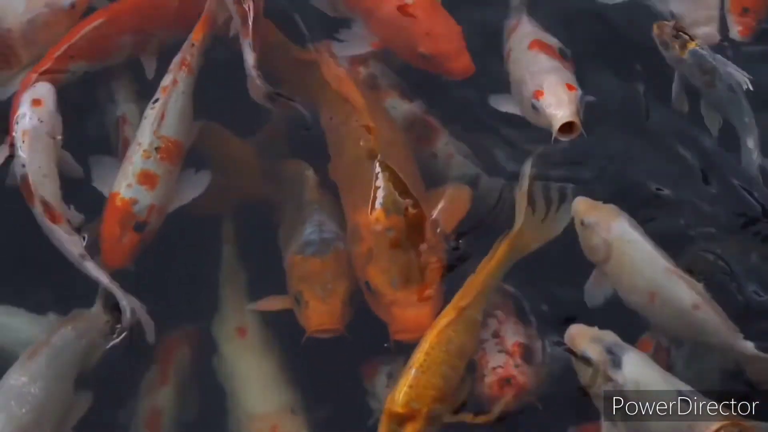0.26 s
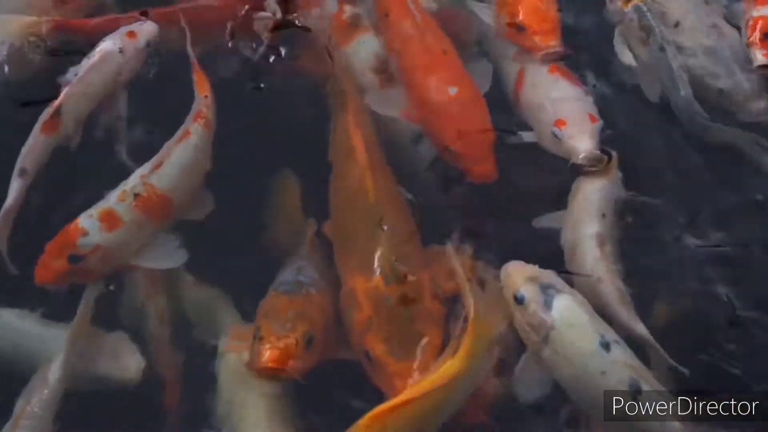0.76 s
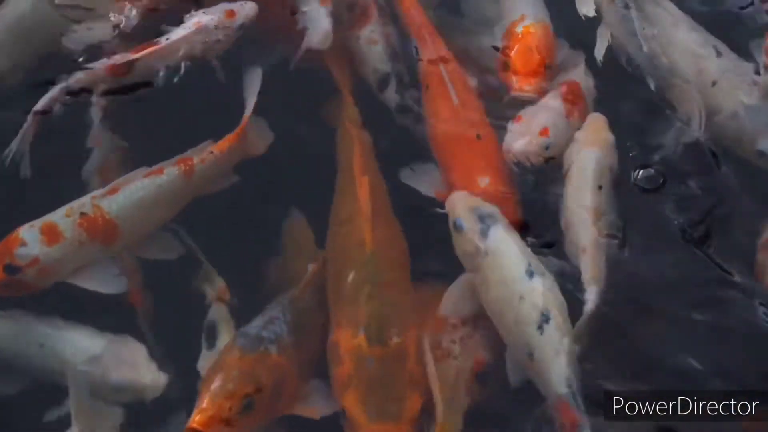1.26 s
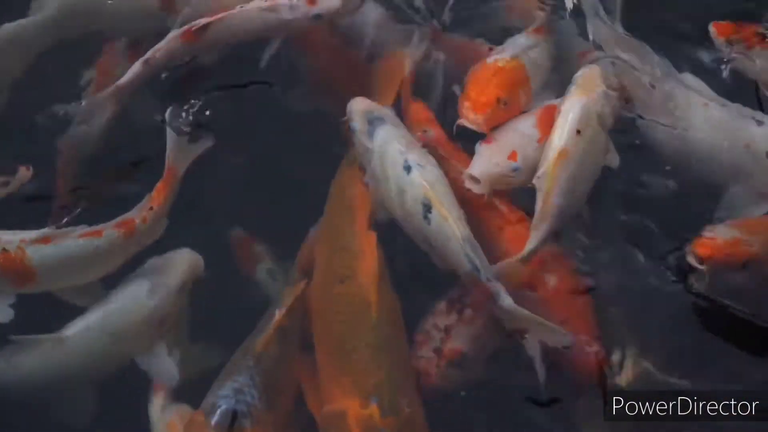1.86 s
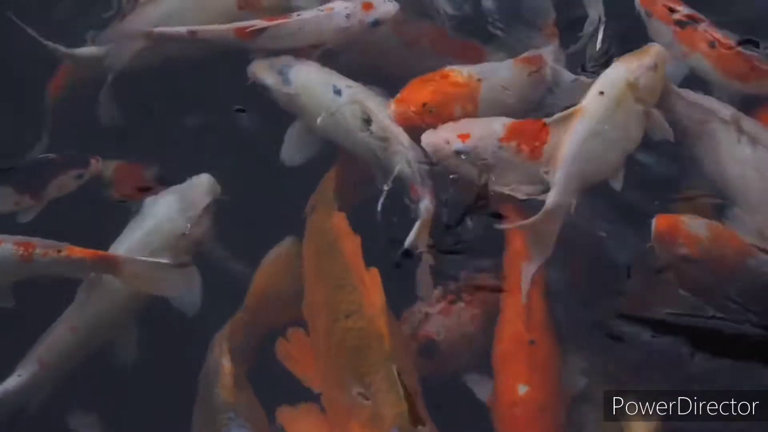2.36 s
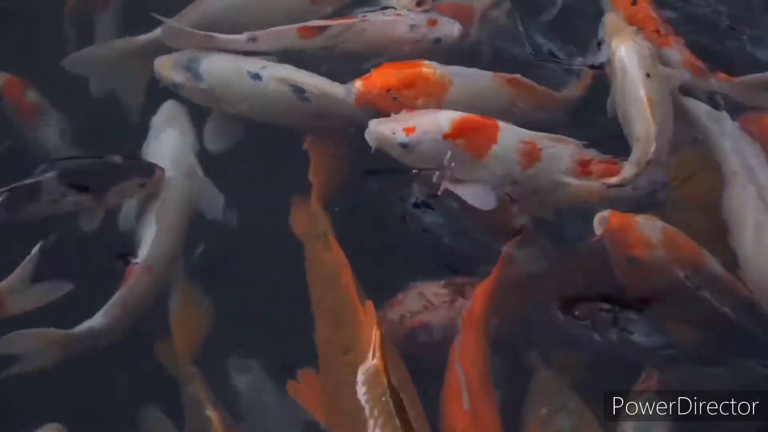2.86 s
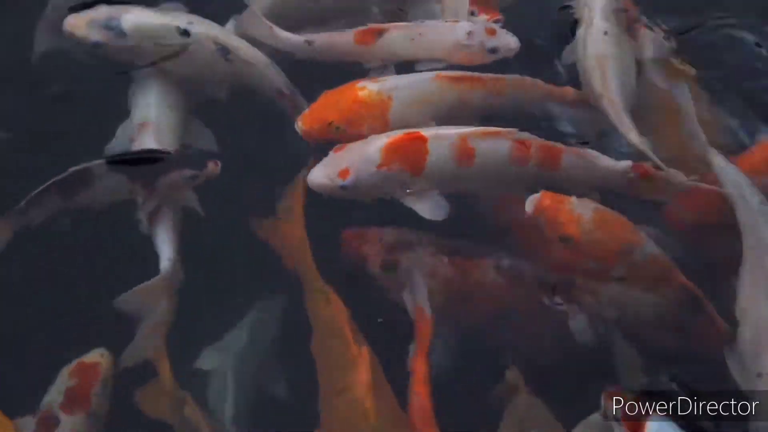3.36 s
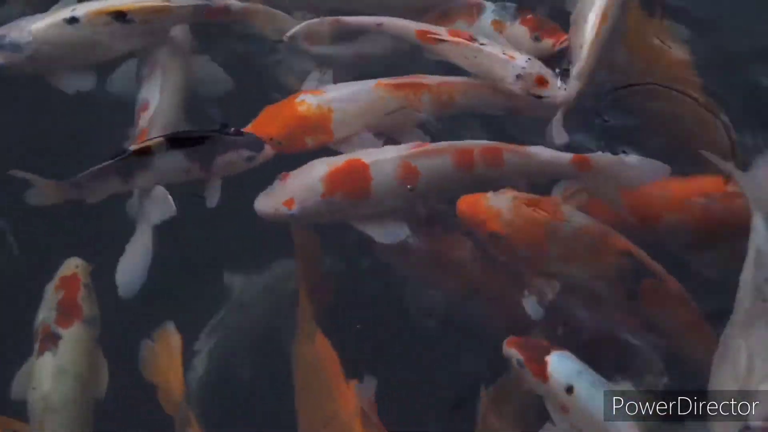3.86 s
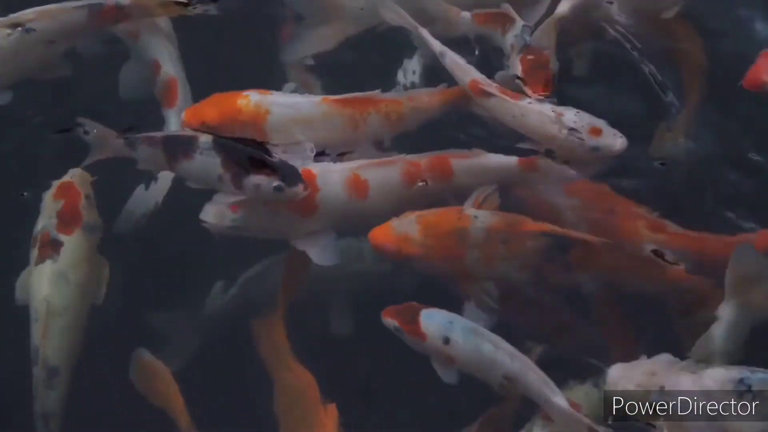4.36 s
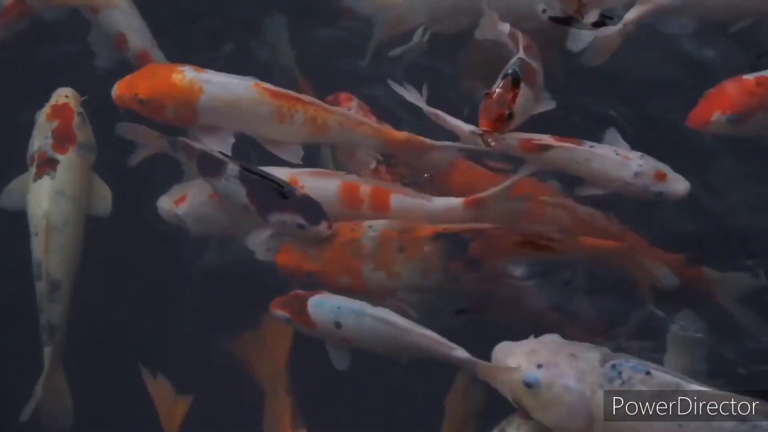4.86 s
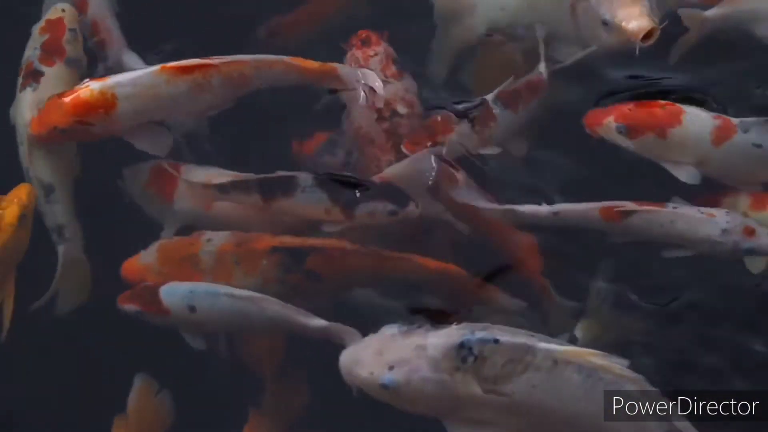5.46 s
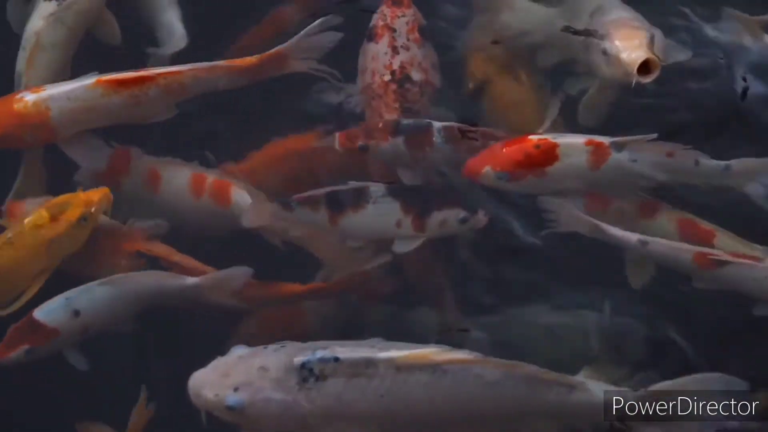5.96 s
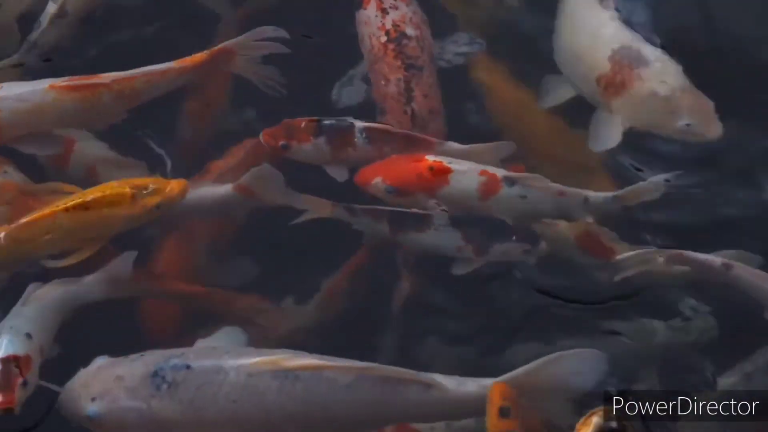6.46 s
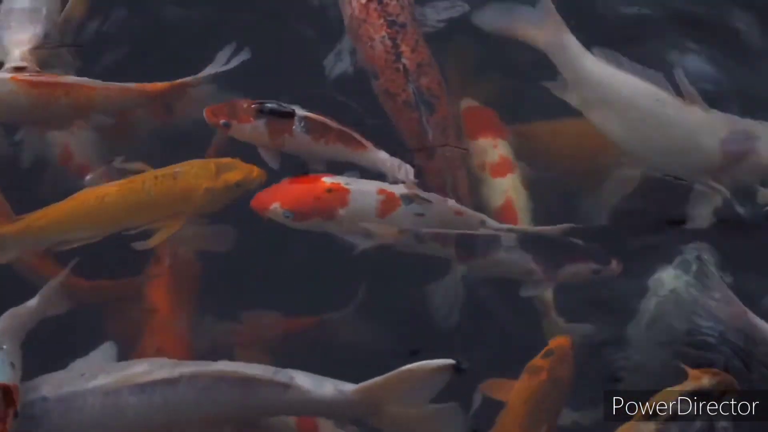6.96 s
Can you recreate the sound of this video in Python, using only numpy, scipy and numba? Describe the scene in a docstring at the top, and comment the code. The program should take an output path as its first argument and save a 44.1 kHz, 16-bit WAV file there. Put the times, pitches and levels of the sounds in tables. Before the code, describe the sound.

Many koi splash and slurp at a pond surface in irregular bursts, with round bubble plops and wet snaps over a faint low hum.

```python
"""Koi crowd at a pond surface, shoving and slurping in irregular bursts: each body or tail stroke drives
swarms of ringing bubbles, crackling spray and a deep slosh. Over these: loud gliding plops, noisy snaps
of lips and fins, gliding tones of hollows in the water, low thuds of gulped air and faint foam ticks.
The pond's edge adds brief echoes; a sine pump hum and filtered-noise air and rumble lie behind."""
import sys
import numpy as np
from scipy import signal
from scipy.fft import rfft, irfft, next_fast_len
from scipy.io import wavfile
from scipy.ndimage import uniform_filter1d
from numba import njit

SR = 44100
rng = np.random.default_rng(int(sys.argv[2]) if len(sys.argv) > 2 else 0)


def inscribe(sig):
    """Save sig as 16-bit PCM at rate SR to the path in sys.argv[1].

    A 1-D sig is mono; a 2-D sig holds one channel per row.
    Samples are clipped to [-1, 1] before scaling.
    """
    pcm = np.round(np.clip(np.atleast_2d(sig).T, -1, 1) * 32767)
    wavfile.write(sys.argv[1], SR, pcm.astype(np.int16))


N = 318313
TIME_S = np.arange(N) / SR

# All event levels are relative; each source applies its own gain.
# Fish shoving through the surface: start_s, length_s, bubbling_db, spray_db, slosh_db
STROKE_EVENTS = [(0.004, 0.062, -36.5, -39.5, -54), (0.23, 0.022, -47.5, -50, -53.5),
                 (0.297, 0.072, -34.5, -37, -51.5), (0.544, 0.058, -34.5, -28, -57),
                 (.61, 0.033, -21, -38, -40), (0.691, 0.1, -32.5, -31, -36),
                 (0.879, .05, -52.5, -45.5, -65), (1.007, .12, -45, -38, -65), (1.2, .17, -81, -47.5, -69),
                 (1.989, 0.051, -35.5, -39, -52), (2.075, 0.12, -27.5, -31, -44.5),
                 (2.29, 0.044, -49, -52, -63), (2.415, .02, -55.5, -39, -56), (2.458, .06, -30, -32, -46.5),
                 (2.539, 0.13, -31.5, -31.5, -38.5), (2.68, 0.15, -44.5, -43, -50),
                 (2.955, 0.011, -34.5, -32, -40), (3.014, 0.095, -42.5, -41.5, -51),
                 (3.415, .03, -38.5, -45, -63), (3.464, 0.045, -31.5, -34.5, -48),
                 (3.563, .07, -46.5, -47, -54), (3.746, 0.016, -49, -49, -59),
                 (3.825, 0.0074, -34, -35.5, -41), (3.895, 0.11, -46.5, -51, -52),
                 (4.038, 0.06, -35, -45.5, -55.5), (4.26, 0.19, -39, -35.5, -52.5),
                 (4.337, 0.091, -30.5, -29.5, -46), (4.424, 0.083, -24, -22, -41.5),
                 (4.548, .025, -14, -28, -33), (4.602, 0.12, -28, -29.5, -38.5),
                 (4.765, .07, -29, -34, -59), (4.861, 0.08, -27, -26.5, -41), (4.975, .04, -28.5, -30, -52),
                 (5.049, 0.074, -28, -29, -41.5), (5.161, 0.013, -29.5, -37.5, -48),
                 (5.325, 0.13, -32, -34, -52), (5.464, 0.15, -28.5, -28, -49),
                 (5.704, 0.041, -32, -30.5, -43), (5.89, 0.13, -32.5, -31, -52.5),
                 (6.042, 0.13, -26, -27, -42), (6.083, 0.029, -16.5, -18.5, -36),
                 (6.337, 0.076, -41.5, -40, -66), (6.441, 0.074, -27.5, -25, -45.5),
                 (6.55, 0.022, -31, -34, -40), (6.657, 0.038, -37.5, -56, -50),
                 (6.849, 0.025, -34.5, -31.5, -47.5), (6.958, .12, -26, -33, -38)]
# Loud single bubbles: start_s, level_db, pitch_hz, decay_cycles (few: slap, many: round plop)
BUBBLE_EVENTS = [(0.018, -29, 2630, 17), (.0515, -42, 1270, 8.1), (0.252, -32.5, 1230, 8.9),
                 (0.3007, -18.5, 1425, 13), (0.3515, -27.5, 1330, 7.5), (.544, -23.5, 1348, 16),
                 (.586, -13, 2550, 5.7), (.6201, -9.5, 1730, 8.1), (.6396, -23, 858, 9),
                 (0.7094, -13.5, 2076, 17), (.745, -26, 2554, 20), (.763, -13.5, 1012, 11.6),
                 (0.813, -16.5, 2729, 5), (0.7772, -18.5, 2227, 9), (1.4825, -39, 3350, 16),
                 (1.987, -25.5, 1710, 5.4), (2.0034, -20.5, 1414, 13), (2.052, -20.5, 2580, 18),
                 (2.0705, -22, 3730, 18), (2.0805, -17, 1780, 4.3), (2.0814, -20, 960, 12),
                 (2.1, -21, 1620, 6), (2.172, -19, 894, 5.5), (2.19, -19.5, 1760, 7.3),
                 (2.223, -18.5, 1150, 3.5), (2.2542, -22.5, 1620, 5.5), (2.4728, -16.5, 1068, 14),
                 (2.519, -13.5, 826, 10), (2.5297, -15.5, 1480, 6), (2.573, -23, 2320, 7),
                 (2.5744, -19, 776, 1.8), (2.6247, -15.5, 2200, 9.1), (2.697, -27.5, 1570, 8.8),
                 (2.809, -15.5, 1714, 7.9), (2.955, -16, 2800, 3.4), (2.97, -20.5, 2010, 3.2),
                 (3.1082, -23.5, 3000, 10.5), (3.371, -32.5, 1517, 16), (3.46, -23.5, 1790, 9.6),
                 (3.4732, -28, 850, 5.4), (3.528, -34, 1767, 25), (3.644, -31, 1780, 14),
                 (3.6748, -27.5, 2130, 4.1), (3.8214, -25.5, 970, 5.6), (3.83, -20.5, 2160, 4.7),
                 (3.998, -32, 2230, 13), (4.045, -20, 1430, 1.8), (4.0747, -25.5, 974, 12),
                 (4.091, -17.5, 1036, 11.5), (4.165, -33, 2060, 6.5), (4.442, -19.5, 1045, 11),
                 (4.4793, -14, 938, 10.7), (4.505, -12.5, 1760, 11), (4.534, -9, 1900, 1.9),
                 (4.5546, -17.5, 930, 8.2), (4.5538, -14.5, 1280, 4.4), (4.6, -15, 1920, 4.7),
                 (4.6033, -16, 2410, 11), (4.7067, -16.5, 1350, 6.7), (4.715, -20.5, 1570, 9),
                 (4.752, -23, 1010, 8), (4.7716, -22, 1760, 11), (4.778, -21, 2580, 7.2),
                 (4.8804, -11, 2250, 7.8), (4.901, -14, 1327, 11), (4.952, -24.5, 1300, 22),
                 (4.9983, -19.5, 1147, 11), (5.0652, -16.5, 1163, 12), (5.0742, -17.5, 2800, 7),
                 (5.103, -14.5, 2920, 11.5), (5.1904, -20.5, 955, 10), (5.269, -27, 1680, 18),
                 (5.288, -31.5, 1040, 7.5), (5.3342, -20, 2500, 7.5), (5.43, -26.5, 1660, 14),
                 (5.473, -15.5, 2340, 13), (5.481, -16.5, 1630, 5.4), (5.5617, -13, 2300, 4.4),
                 (5.5818, -15, 1048, 14.5), (5.595, -15, 1670, 3.5), (5.7038, -12, 850, 6.9),
                 (5.823, -26.5, 2320, 4.6), (5.9094, -20, 2980, 15), (5.9984, -23.5, 840, 12),
                 (6.045, -17, 1230, 5.1), (6.062, -19, 3470, 11), (6.1157, -14, 2170, 8),
                 (6.1178, -14.5, 997, 6.1), (6.296, -27, 2100, 8), (6.4072, -30, 1920, 6),
                 (6.435, -20.5, 2420, 8.5), (6.471, -23.5, 1050, 21), (6.556, -13, 1026, 21.6),
                 (6.569, -20.5, 2060, 6.5), (6.815, -39, 1100, 7.4), (6.9573, -6.5, 1240, 7),
                 (6.997, -18.5, 2450, 17), (7.026, -22, 810, 3.9)]
# Wet snaps of lips, fins and bursting films: start_s, level_db, centre_hz, spread (relative octaves)
SNAP_EVENTS = [(0.017, -26, 5600, 0.54), (0.05, -22.5, 7660, 0.099), (.084, -33.5, 8000, 0.64),
               (0.1715, -33.5, 4450, 0.71), (0.203, -32, 6030, .1), (0.242, -32.5, 6450, 0.65),
               (.3054, -19.5, 8060, .1), (.351, -27.5, 9000, 0.34), (0.37, -25, 3900, 0.31),
               (.3967, -26.5, 10000, .2), (.431, -34.5, 5370, 0.13), (0.475, -29.5, 5650, .8),
               (0.5804, -18, 5740, 0.42), (0.6697, -18, 4320, 0.07), (0.6831, -15.5, 7100, 0.23),
               (0.7082, -16, 5710, 0.84), (0.7942, -24, 3350, 0.28), (0.811, -24.5, 3360, 0.88),
               (1.0138, -23, 5060, 0.1), (1.0646, -17.5, 5970, 0.19), (1.129, -26, 5330, 0.27),
               (1.19, -29.5, 3920, 0.35), (1.302, -26, 10270, 0.13), (1.4742, -36.5, 6000, 0.3),
               (1.8945, -40, 8100, 0.25), (2.0035, -22, 4150, 0.19), (2.232, -22.5, 3850, .45),
               (2.2953, -23, 4050, 0.77), (2.4855, -23.5, 4200, .23), (2.5816, -28, 5840, 0.21),
               (2.6, -20.5, 4060, .35), (2.6172, -11.5, 5400, 0.62), (2.75, -18, 6460, 0.74),
               (2.7533, -25, 6460, .5), (2.809, -23, 5700, 1.2), (2.842, -33, 7230, 0.46),
               (2.861, -32, 8220, .3), (2.8966, -27, 4430, .1), (2.951, -22.5, 4420, 0.73),
               (2.9713, -22.5, 6700, 0.24), (3.0371, -25.5, 6500, 0.3), (3.048, -20, 5060, 0.16),
               (3.1057, -31, 3270, .5), (3.378, -29.5, 3880, 0.15), (3.4057, -28, 6360, 0.078),
               (3.4277, -20, 5120, .15), (3.4924, -21.5, 2750, 0.18), (3.527, -33, 3550, 0.25),
               (3.572, -28, 7680, 1.2), (3.6202, -31, 5060, 0.26), (3.6684, -34, 6100, .1),
               (3.793, -31, 5850, 0.59), (4.043, -24.5, 2570, 0.28), (4.075, -32, 4690, 0.62),
               (4.156, -26, 11670, 0.1), (4.2508, -17.5, 2970, 0.21), (4.5297, -14, 3260, 0.23),
               (4.5978, -20.5, 4340, 0.79), (4.671, -18, 6400, 0.42), (4.692, -17.5, 5170, 0.52),
               (4.7477, -21.5, 7430, 0.18), (4.7924, -20, 8160, 0.23), (4.809, -18.5, 6600, 1),
               (4.838, -22, 3500, 0.74), (4.9003, -24, 4990, 1.1), (5.089, -24.5, 4670, .8),
               (5.2989, -27, 9200, .1), (5.3356, -23.5, 3770, 1), (5.4863, -18.5, 4730, 0.45),
               (5.5584, -14.5, 7700, 0.21), (5.583, -23.5, 3560, 1.2), (5.7034, -21, 7150, 0.19),
               (5.7283, -22, 4170, 0.15), (5.8373, -22.5, 7260, .2), (5.868, -25.5, 6400, 0.2),
               (5.9087, -22.5, 4160, .6), (6.0728, -15, 6170, .9), (6.1002, -13, 4900, 0.23),
               (6.108, -9, 6630, 1), (6.274, -28, 6440, .6), (6.349, -27.5, 7300, 0.19),
               (6.4106, -22.5, 8200, 0.54), (6.4409, -19, 4070, 0.11), (6.5688, -21, 5540, 0.94),
               (6.657, -31.5, 3970, .8), (6.6846, -27.5, 6380, 0.13), (6.701, -27, 5680, 0.23),
               (6.782, -29.5, 5300, 0.27), (6.899, -23.5, 8200, 0.94), (6.9702, -18.5, 4150, 0.7),
               (7.041, -21.5, 5800, 0.64), (7.0845, -16.5, 4640, 0.39)]
# Big air pockets pushed under by a body: start_s, level_db, start_pitch_hz, decay_s
GULP_EVENTS = [(.613, -23, 280, 0.0067), (.691, -30, 440, 0.022), (0.794, -21, 233, 0.0088),
               (1.19, -47, 260, .01), (2.233, -26.5, 540, 0.015), (2.531, -25, 433, 0.021),
               (2.575, -20, 560, 0.0088), (2.75, -31, 262, 0.0094), (2.8845, -16, 263, 0.0069),
               (3.532, -37, 603, .015), (4.499, -34, 81, 0.043), (4.568, -24, 300, .02),
               (4.692, -22.5, 223, 0.014), (4.907, -25, 267, 0.0057), (5.137, -24.5, 606, 0.0089),
               (6.111, -13, 286, .0048), (6.557, -35, 267, 0.017), (6.954, -16, 222, 0.0092)]
# Open hollows that resonate, then close: start_s, length_s, level_db, first_pitch_hz, last_pitch_hz
HOLLOW_EVENTS = [(.63, .18, -37, 855, 750), (1.935, 0.035, -35.5, 840, 1050), (2.0, .23, -34, 895, 811),
                 (2.305, 0.026, -41.5, 693, 1090), (2.561, .11, -35, 596, 590),
                 (2.749, .028, -41, 823, 1270), (2.783, 0.019, -35.5, 2440, 3660),
                 (2.889, 0.033, -36, 606, 600), (3.069, 0.013, -28, 1240, 1840),
                 (3.097, 0.026, -36.5, 1250, 2030), (3.164, .048, -41.5, 1290, 2180),
                 (3.463, 0.052, -40.5, 872, 665), (3.524, .15, -44, 640, 1014),
                 (3.786, .021, -44, 1080, 1350), (4.086, 0.064, -42, 1014, 1043),
                 (4.416, 0.19, -41, 950, 862), (4.95, 0.21, -35.5, 848, 792), (5.453, .06, -34, 926, 980),
                 (5.955, 0.064, -32.5, 1119, 860), (6.191, 0.062, -36.5, 728, 908),
                 (6.421, 0.13, -31.5, 855, 867), (6.553, 0.046, -26, 1014, 1053),
                 (7.026, 0.083, -33, 861, 882)]
# Spectrum of the bubbling: freq_hz, level_db
BUBBLING_COLOUR = [(450, -17), (680, -22.5), (850, 1), (1200, 1.5), (1800, 2.5), (2600, -2.5), (3600, -15),
                   (5000, -11)]
# Spectrum of the spray: freq_hz, level_db
SPRAY_COLOUR = [(1500, -15.5), (2600, -9), (3600, 6), (5000, 4.5), (7500, 5.5), (10000, 1.5), (13000, -3.5),
                (16000, -21.5)]
# Duller spectrum of big drops, on top of the spray's: freq_hz, level_db
COARSE_COLOUR = [(2500, 6.5), (4500, -1.5), (8000, -1.5), (12000, -5.0), (16000, -15.5)]
# Spectrum of the deep slosh: freq_hz, level_db
SLOSH_COLOUR = [(70, -23.5), (140, -14.5), (220, 3), (330, 4), (480, -10.5), (650, -0.5), (1000, -50)]
# Spectrum of the foam ticks: freq_hz, level_db
FOAM_COLOUR = [(1200, -27), (3000, -19.0), (7000, 1.0), (10000, -0.5), (16000, -4.5)]
# Pump hum partials: freq_hz, level_db (rms before wander)
HUM_PARTIALS = [(119.9, -53.5), (237.5, -63.5)]
# Spectrum of the outdoor air: freq_hz, level_db
AIR_COLOUR = [(30, 7), (70, -18.5), (150, -6.5), (260, -4.5), (450, -16), (1000, -16), (2500, -24.5),
              (5000, -27), (8000, -31.5), (12000, -27.5), (16000, -24.5)]
# Spectrum of the low rumble: freq_hz, level_db
RUMBLE_COLOUR = [(12, 9.5), (25, 6.5), (45, -4.5), (90, -10.5), (200, -29), (600, -85), (2000, -100)]
# Rumble level over time: time_s, level_db
RUMBLE_LEVEL = [(0, -52), (.6, -45), (1.2, -51.5), (2.7, -51), (3.12, -42.5), (3.5, -48), (3.85, -42),
                (4.25, -51), (4.52, -39), (4.7, -45), (5.7, -41), (6.8, -45.5), (7.2, -41)]

SWELL_S, SETTLE_S = 0.013, 0.027  # time constants before and after a stroke
SAG_DB_PER_S = 10  # a stroke loses force as it goes on
# What lingers: level_db re stroke, decay_s
LAST_BUBBLES, LAST_DROPS, LAST_SLOSH = (-19, 0.22), (-11, 0.18), (-15.5, 0.2)
SPRAY_LEAD_S, SLOSH_LAG_S = 0.0036, 0.006  # shifts ahead of and behind the bubbling
RISE_OCTAVES_PER_DECAY, RISE_SCATTER_OCTAVES = 0.0093, 0.085
SNAP_DECAY_S, RAGGED_S_PER_SPREAD = 0.003, 0.0031  # wide, ragged snaps last longer
AIR_DB = -58.5  # rms above 150 Hz
TOP_HZ = 15800


def churn():
    """Stirred water: bubbling, spray, slosh and tinkle follow the strokes' force."""
    _, _, bubbling_peaks_db, spray_peaks_db, slosh_peaks_db = np.transpose(STROKE_EVENTS)
    bubbling_db = stirring(bubbling_peaks_db, LAST_BUBBLES)
    spray_db = stirring(spray_peaks_db, LAST_DROPS, -SPRAY_LEAD_S)
    slosh_db = stirring(slosh_peaks_db, LAST_SLOSH, SLOSH_LAG_S)
    tinkle_db = np.interp((bubbling_db + spray_db) / 2, [-60, -50, -22], [-73, -55, -39])
    water = bubbling(bubbling_db) * undb(bubbling_db + 0.5)
    water += spray(bubbling_db) * undb(spray_db - 3.5)
    water += slosh() * undb(slosh_db)
    return water + tinkle() * undb(tinkle_db)


def stirring(levels_db, lingers, lag_s=0):
    """Level in dB over time: strokes swell, sag, settle and leave a faint tail; their powers add."""
    t_s = TIME_S[::44] - lag_s
    power = 1e-12
    tail_db, tail_s = lingers
    for (start_s, length_s, *_), db in zip(STROKE_EVENTS, levels_db):
        before_s = np.maximum(start_s - t_s, 0)
        after_s = np.maximum(t_s - start_s - length_s, 0)
        sag_db = SAG_DB_PER_S * (np.clip(t_s - start_s, 0, length_s) - length_s / 2)
        tail = undb(tail_db) * np.exp(-after_s / tail_s)
        release = np.maximum(np.exp(-after_s / SETTLE_S), tail)
        gain = undb(db - sag_db) * np.exp(-before_s / SWELL_S) * release
        power = power + gain ** 2
    return np.interp(TIME_S - lag_s, t_s, 10 * np.log10(power))


def bubbling(bubbling_db):
    """Trapped bubbles ring singly; the harder the stirring, the more they merge into a rush."""
    lone = unit(swarm(rate_hz=1400, low_hz=681, high_hz=4190, cycles=11.5, spread_db=8.5,
                      rise_octaves=0.05, even_s=0.048))
    rush = crackle(rate_hz=1500, spread_db=18, smear_s=0.011)
    merged = np.interp(bubbling_db, [-50, -22], [0.35, 0.7])
    return colour(np.sqrt(1 - merged) * lone + np.sqrt(merged) * rush, BUBBLING_COLOUR)


def spray(bubbling_db):
    """Ringing droplets over a crackle; heavy churning throws bigger drops, which sound duller."""
    droplets = swarm(rate_hz=1300, low_hz=2400, high_hz=13000, cycles=10, spread_db=5.5,
                     rise_octaves=0.01, even_s=0.05)
    patter = crackle(rate_hz=330, spread_db=6, smear_s=0.011)
    fine = colour(unit(droplets) + undb(-5) * patter, SPRAY_COLOUR)
    coarse_share = np.interp(bubbling_db, [-46, -28], [0, 0.85])
    return (1 - coarse_share) * fine + coarse_share * colour(fine, COARSE_COLOUR)


def slosh():
    """Low, short-ringing bubbles shaped into the deep movement of the water."""
    deep = swarm(rate_hz=350, low_hz=137.6, high_hz=720, cycles=4.04, spread_db=2,
                 rise_octaves=0.087, even_s=0.043)
    return colour(deep, SLOSH_COLOUR)


def tinkle():
    """Small high bubbles, which even light dribbling makes."""
    return unit(swarm(rate_hz=900, low_hz=2200, high_hz=3500, cycles=11, spread_db=4.5,
                      rise_octaves=0.03, even_s=0.09))


def swarm(rate_hz, low_hz, high_hz, cycles, spread_db, rise_octaves, even_s):
    """A random crowd of bubbles, a few far louder than the rest, at a steady mean level."""
    when, pitch, size, life, glide = rng.random((int(rate_hz * N / SR), 5)).T
    hz = low_hz * (high_hz / low_hz) ** pitch
    gain = undb(-spread_db * np.log(1 - 0.98 * size)) * hz / low_hz
    decay_s = cycles * 3 ** (life - 0.5) / hz
    x = ring(when * N / SR, gain, hz, decay_s, rise_octaves * 2 * glide, 0.33)
    power = smooth_twice(x ** 2, int(even_s * SR))
    return x / np.sqrt(np.abs(power) + 0.02 * np.mean(power))


def crackle(rate_hz, spread_db, smear_s):
    """Drops land as noise ticks, a few strong, each breaking into a short patter; rms 1."""
    when, size = rng.random((int(rate_hz * N / SR), 2)).T
    strength = undb(-spread_db * np.log(1 - 0.98 * size))
    ticks = np.bincount((when * N).astype(int), strength, N)
    power = signal.lfilter([1], [1, -np.exp(-2 / (smear_s * SR))], ticks ** 2)
    mean_power = smooth_twice(power, SR // 20)
    return unit(rng.standard_normal(N) * np.sqrt(power / (np.abs(mean_power) + 1e-9)))


@njit
def ring(start_s, gain, hz, decay_s, rise_octaves, swell):
    """Bubbles swell as they pinch off, ring down and glide in pitch, as on nearing the surface."""
    out = np.zeros(N)
    for k in range(len(start_s)):
        first, phase = int(start_s[k] * SR), 0.
        for i in range(min(int(5 * decay_s[k] * SR), N - first)):
            u = i / SR / decay_s[k]  # age in decay lengths
            pitch_hz = hz[k] * 2 ** (rise_octaves[k] * (min(u, 2.5) - .5))
            phase += 2 * np.pi * min(pitch_hz, .45 * SR) / SR
            envelope = (1 - np.exp(-u / swell)) * np.exp(-1.3 * u ** 1.4)
            out[first + i] += 1.5 * gain[k] * envelope * np.sin(phase)
    return out


def bubbles():
    """Loud plops, each a decaying sine gliding in pitch and wobbling a little in strength."""
    start_s, db, hz, cycles = np.transpose(BUBBLE_EVENTS).copy()
    rise_octaves = RISE_OCTAVES_PER_DECAY + RISE_SCATTER_OCTAVES * rng.standard_normal(len(start_s))
    plops = ring(start_s, undb(db + 2.5), hz, cycles / hz, rise_octaves, 0.15)
    return plops * undb(0.51 * walk(480))


def snaps():
    """A water film breaks: a sharp, ragged crack of noise and the ring of a tiny bubble."""
    out, t_s = np.zeros(N), TIME_S[:SR // 20]
    for start_s, db, hz, spread in SNAP_EVENTS:
        grains = rng.standard_normal(len(t_s)) * undb(0.74 * walk(1600, size=len(t_s)))
        fade = np.exp(-t_s / (SNAP_DECAY_S + RAGGED_S_PER_SPREAD * spread))
        crack = unit(band(band(grains * fade, hz, 1.28 * spread), hz, 6.9 * spread))
        ping = unit(np.sin(2 * np.pi * hz * t_s * (1 + 3 * t_s)) * fade)
        # the narrower the snap, the more of it is one bubble
        pure = np.exp(-(spread / 0.18) ** 2)
        snap = np.sqrt(1 - pure) * crack + np.sqrt(pure) * ping
        add(out, start_s, undb(db + 2.93) * np.sqrt(np.mean(fade ** 2)) * snap)
    # water is soft: round off the very top
    return signal.lfilter(*signal.butter(2, 12500, fs=SR), out)


def gulps():
    """A big, misshapen air pocket thuds as a rising decaying sine with a rough upper noise band."""
    out, t_s = np.zeros(N), TIME_S[:SR // 6]
    for start_s, db, hz, decay_s in GULP_EVENTS:
        tone = np.sin(2 * np.pi * hz * t_s * (1 + 1.8 * t_s)) * np.exp(-t_s / decay_s)
        noise = rng.standard_normal(len(t_s))
        rough = unit(band(band(noise, 2.13 * hz, 1), 2.13 * hz, 1))
        upper = rough * np.exp(-t_s / (1.14 * decay_s))
        attack = 1 - np.exp(-4 * hz * t_s)
        add(out, start_s, undb(db) * (tone + 0.6 * upper) * attack)
    return out


def hollows():
    """Trickle keeps a trough's air ringing unsteadily; pitch moves faster as the trough closes."""
    out = np.zeros(N)
    for start_s, length_s, db, first_hz, last_hz in HOLLOW_EVENTS:
        u = np.linspace(0, 1, int(length_s * SR))
        pitch_hz = first_hz * (last_hz / first_hz) ** (u ** 1.52)
        phase = 2 * np.pi * np.cumsum(pitch_hz) / SR
        steady = np.sin(phase) * (1 + 1.3 * walk(111.7, size=len(u)))
        unsteady = 2 * walk(107.5, size=len(u)) * np.cos(phase)
        envelope = np.abs(np.sin(np.pi * u)) ** 0.38
        add(out, start_s, undb(db - 1) * unit((steady + unsteady) * envelope))
    return out


def foam():
    """Tiny floating bubbles burst one by one as faint ticks of coloured noise."""
    ticks = crackle(rate_hz=130, spread_db=9, smear_s=0.003)
    return undb(-52.5) * colour(ticks, FOAM_COLOUR)


def surroundings(x, early_db, early_s, tail_db, t60_s):
    """A few scattered echoes from the pond's edge, then a faint, duller noise tail."""
    t_s = TIME_S[:SR // 2]
    count = 14
    lags_s = 0.005 + early_s * (np.arange(count) + rng.random(count)) / 4
    early = np.zeros(len(t_s))
    slots = np.minimum((lags_s * SR).astype(int), len(t_s) - 1)
    early[slots] = rng.choice([-1, 1], count) * np.exp(-lags_s / early_s)
    decay = np.exp(-np.log(1000) * t_s / t60_s)
    tail = rng.standard_normal(len(t_s)) * (1 - np.exp(-t_s / 0.017)) * decay
    response = undb(early_db) * band(unit(early), 2440, 1.43)
    response += undb(tail_db) * band(unit(tail), 870, 0.97)
    return x + signal.fftconvolve(x, response / np.sqrt(len(t_s)))[:N]


def background():
    """Pump hum of wandering sines, air noise and a low noise rumble that comes and goes."""
    hum = np.zeros(N)
    for hz, db in HUM_PARTIALS:
        gain = undb(db + walk(5)) * np.sqrt(2)
        hum += gain * np.sin(2 * np.pi * hz * TIME_S + 0.25 * walk(7))
    air = colour(rng.standard_normal(N), AIR_COLOUR)
    highpass = signal.butter(4, 150, "highpass", fs=SR, output="sos")
    air = air / np.std(signal.sosfilt(highpass, air))
    rumble = colour(rng.standard_normal(N), RUMBLE_COLOUR)
    rumble_db = np.interp(TIME_S, *np.transpose(RUMBLE_LEVEL))
    return hum + undb(AIR_DB) * air + rumble * undb(rumble_db)


def undb(db):
    """Decibels to gain."""
    return 10 ** (np.asarray(db) / 20)


def unit(x):
    """Scale to rms 1."""
    return x / np.sqrt(np.mean(x ** 2) + 1e-18)


def add(out, start_s, x):
    """Mix x into out at start_s."""
    i = max(int(start_s * SR), 0)
    out[i:i + len(x)] += x[:max(len(out) - i, 0)]


def smooth_twice(x, size):
    """Two passes of a moving average over size samples."""
    return uniform_filter1d(uniform_filter1d(x, size), size)


def colour(x, points):
    """Shape x with a spectrum of (freq_hz, level_db) points; rms 1."""
    hz, db = np.transpose(points)
    size = next_fast_len(len(x) + 2048)
    bins_hz = np.maximum(np.fft.rfftfreq(size, 1 / SR), 1)
    gain = undb(np.interp(np.log(bins_hz), np.log(hz), db))
    return unit(irfft(rfft(x, size) * gain, size)[:len(x)])


def band(x, hz, octaves):
    """Gentle causal band-pass, about so many octaves to each side of hz, within safe limits."""
    ratio = 2 ** max(octaves, 0.05)
    high_hz = min(hz * ratio, 0.45 * SR)
    low_hz = min(hz / ratio, 0.9 * high_hz)
    return signal.lfilter(*signal.butter(1, [low_hz, high_hz], "bandpass", fs=SR), x)


def walk(rate_hz, size=N):
    """Smooth chance with spread near 1: lines between random knots, rate_hz of them a second."""
    knots = rng.standard_normal(int(size / SR * rate_hz) + 3)
    return 1.2 * np.interp(np.arange(size) / SR * rate_hz, np.arange(len(knots)), knots)


def scene():
    """All water sounds share one space; the background is added without echoes."""
    water = churn() + bubbles() + snaps() + gulps() + hollows() + foam()
    echoed = surroundings(water, early_db=-13, early_s=0.01, tail_db=-19.5, t60_s=0.37)
    return (echoed + background())[None]


def record(dry):
    """A steep elliptic low-pass cuts the top above TOP_HZ."""
    return signal.sosfilt(signal.ellip(10, 0.2, 70, TOP_HZ, fs=SR, output="sos"), dry)


dry = scene()
out = record(dry)
inscribe(out)
```